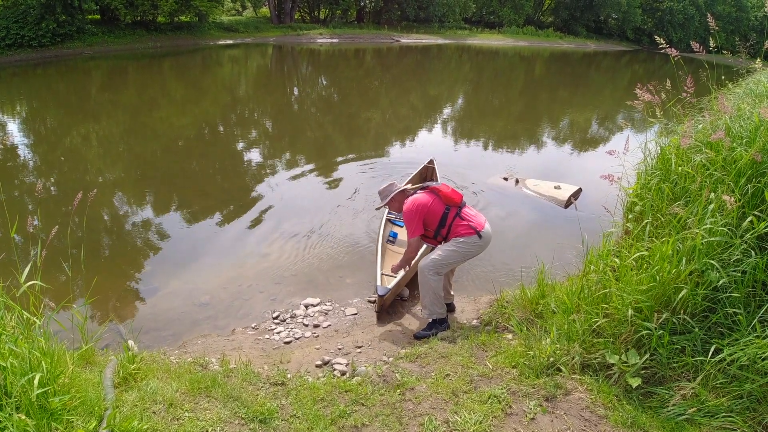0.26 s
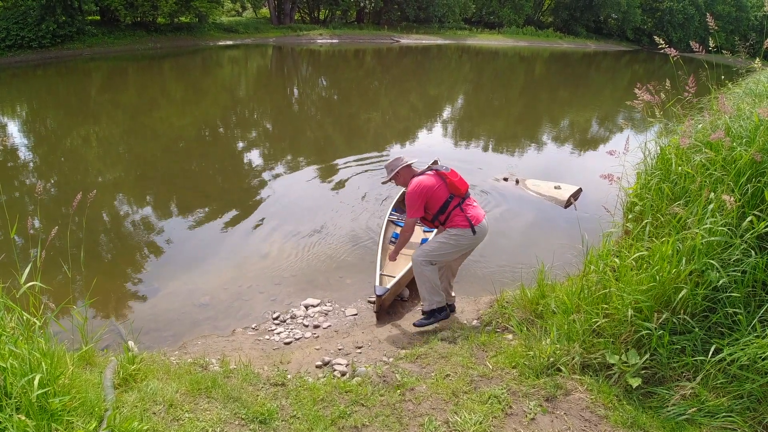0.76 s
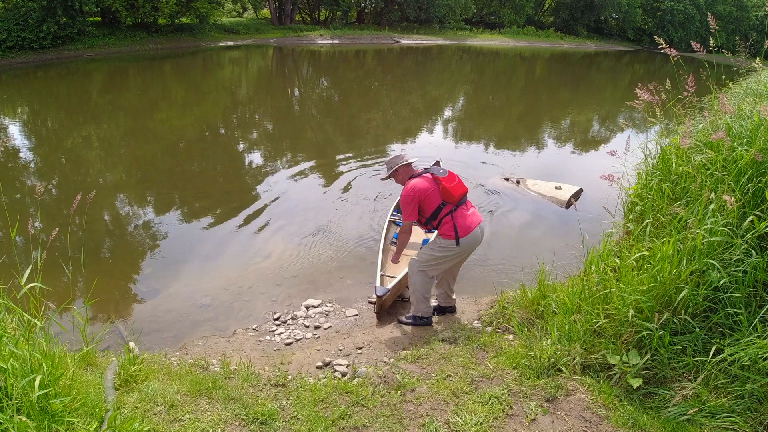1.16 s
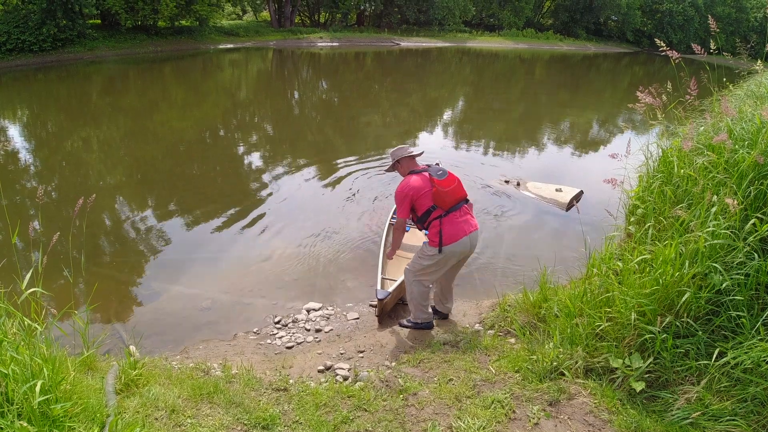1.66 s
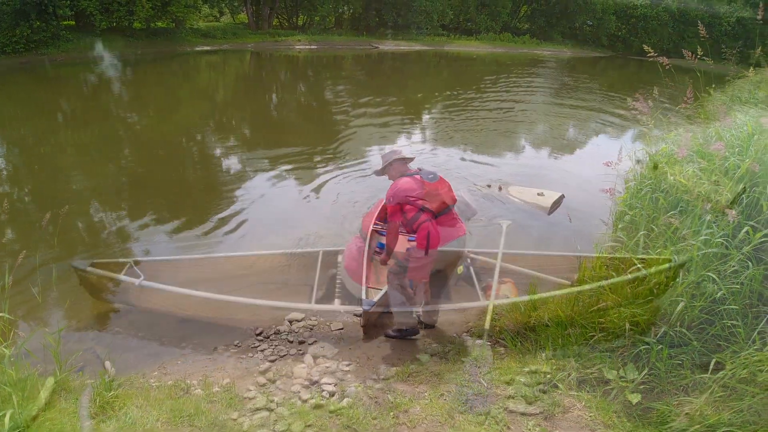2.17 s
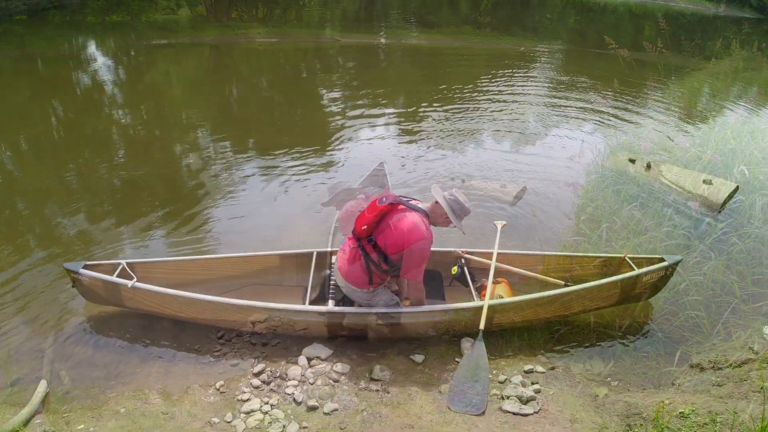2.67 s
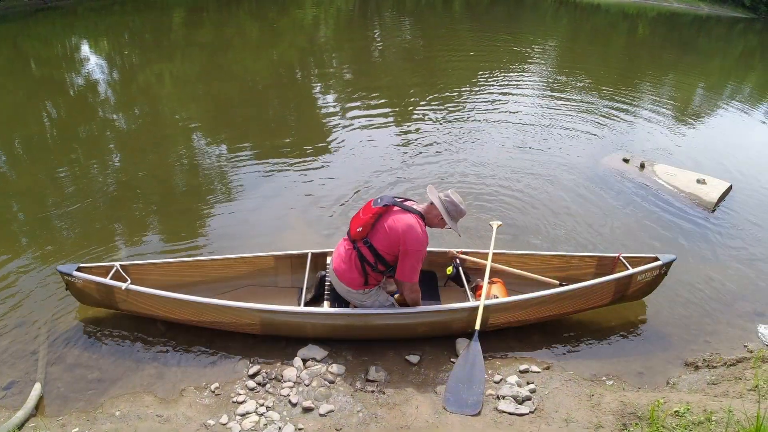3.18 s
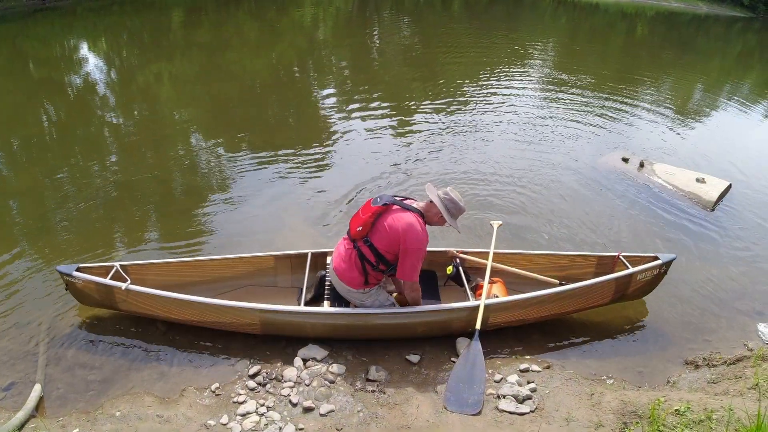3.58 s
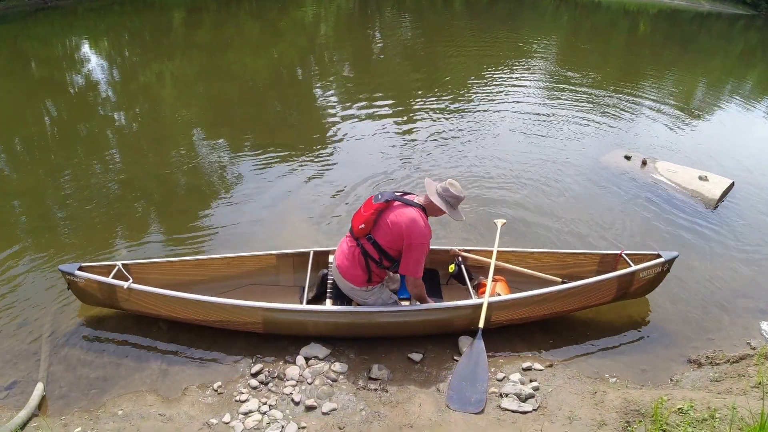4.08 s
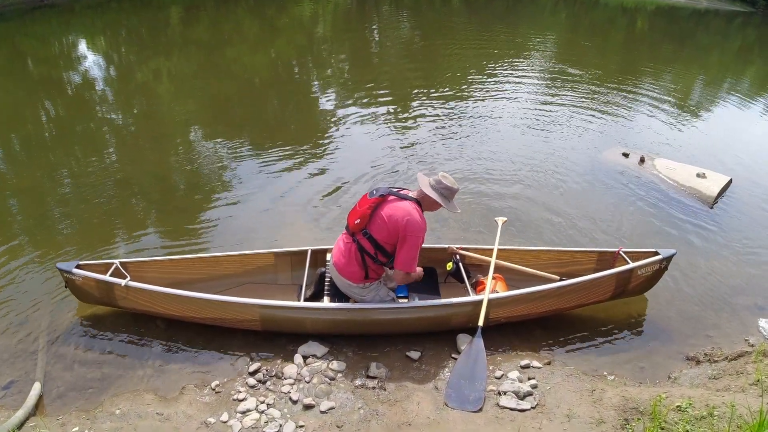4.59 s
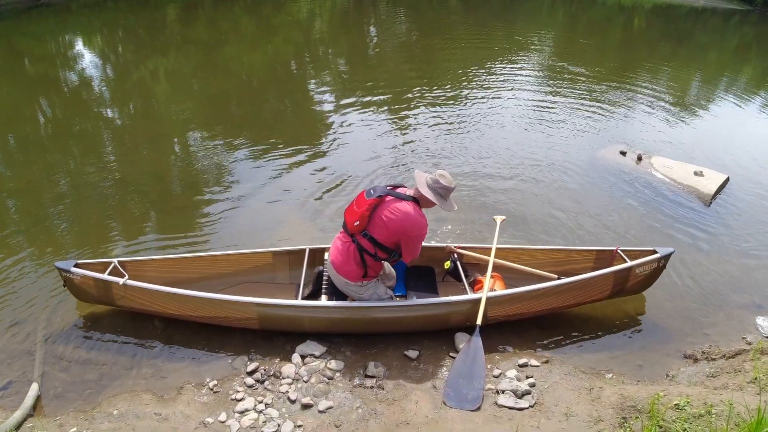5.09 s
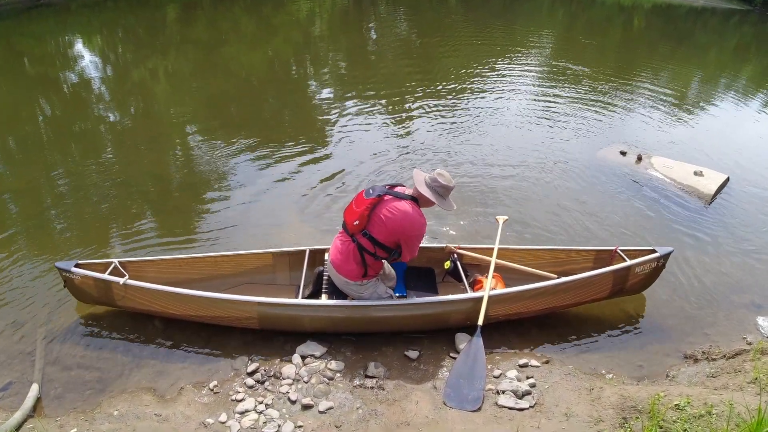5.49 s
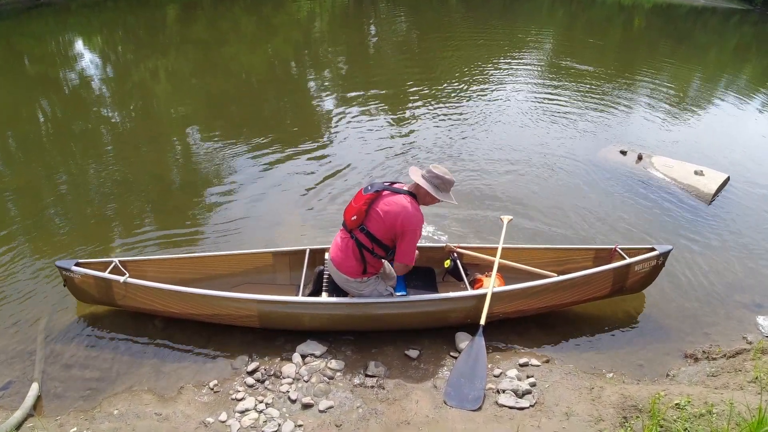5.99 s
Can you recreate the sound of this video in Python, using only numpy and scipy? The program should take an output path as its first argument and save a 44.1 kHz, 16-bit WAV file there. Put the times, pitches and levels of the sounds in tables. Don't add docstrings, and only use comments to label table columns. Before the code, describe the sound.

At a quiet riverbank, a few isolated knocks and scuffs sound on a hollow canoe while a distant warbler sings quick, echoing whistles. The sound crossfades to a nearer spot: steady pure whistles, a sparrow's buzzes, evenly spaced chips and a short trill, then clustered thumps, clacks and rattling gear. Soft wind, leaves and low distant traffic continue underneath, captured in stereo by a small microphone pair.

```python
import sys
import numpy as np
from scipy import signal
from scipy.fft import rfft, irfft, next_fast_len
from scipy.io import wavfile
from scipy.ndimage import uniform_filter1d, map_coordinates

SR = 44100
rng = np.random.default_rng(int(sys.argv[2]) if len(sys.argv) > 2 else 0)


def pcm_store(signal):
    levels = np.round(np.clip(np.atleast_2d(signal), -1, 1) * 32767)
    wavfile.write(sys.argv[1], SR, levels.astype(np.int16).T)


def gain_from_decibels(decibels):
    exponent = np.asarray(decibels, float) / 20
    return 10 ** exponent


N = 275625
MOVED_S = 2.6


def at_hz(points, hz):
    points = np.array(points)
    return np.interp(np.log(hz + 1), np.log(points[:, 0] + 1), points[:, 1])


def rms_one(x):
    return x / np.sqrt(np.mean(x ** 2) + 1e-20)


def add(track, s, sound):
    i = round(s * SR)
    track[i:i + len(sound)] += sound[:N - i]


def drift(rate):
    knots = rng.standard_normal(int(rate * N / SR) + 4)
    steps = np.arange(0, N + 32, 32)
    return np.interp(np.arange(N), steps, map_coordinates(knots, [steps * rate / SR], order=3))


def bandpass(x, band_hz, order):
    return signal.sosfilt(signal.butter(order, band_hz, "band", fs=SR, output="sos"), x)


def resonate(x, hz, width_hz):
    r = np.exp(-np.pi * width_hz / SR)
    zeros = np.array([1, 0, -1]) * (1 - r * r) / 2
    poles = [1, -2 * r * np.cos(2 * np.pi * hz / SR), r * r]
    return signal.lfilter(zeros, poles, x)


def sweep(length_s, from_hz, to_hz, edge, wobble_hz=0):
    n = round(length_s * SR)
    wobble = wobble_hz * np.interp(np.arange(n), np.linspace(0, n, 8), rng.standard_normal(8))
    turns = np.cumsum(np.linspace(from_hz, to_hz, n) + wobble) / SR + rng.random()
    return np.sin(2 * np.pi * turns) * signal.windows.tukey(n, np.clip(edge, 0, 1))


def whistle(rows):
    s, hz, level_db = np.transpose(rows)
    t = np.arange(s[0], s[-1], 1 / SR)
    wave = np.sin(2 * np.pi * np.cumsum(np.interp(t, s, hz)) / SR)
    return np.sqrt(2) * gain_from_decibels(np.interp(t, s, level_db)) * wave * signal.windows.tukey(len(t), .12)


# (frequency [Hz], left lead [rad])
FAR_PORTS = [(0, 0), (800, 0), (1400, .3), (2000, 1.5), (2900, 1.1), (3300, 2.1), (4600, 1.8), (5500, 0),
             (9000, 0)]
NEAR_PORTS = [(0, 0), (1100, .3), (2000, .7), (2350, -2.1), (3000, -2.2), (3700, -4), (4300, -4.2),
              (4600, -5.5), (5700, -5.9), (7000, -6.3), (9000, -6.5)]
WHISTLER_PORTS = [(0, 0), (3274, -2.3)]


def ports(x, lead):
    size = next_fast_len(N + 2048)
    turn = np.exp(.5j * at_hz(lead, np.arange(size // 2 + 1) * SR / size))
    return irfft(rfft(x, size) * np.array([turn, 1 / turn]), size)[:, :N]


def outdoors(x, lead, echo_s, echo_db, bush_db, bush_t60, trees_db, trees_t60, clear=0):
    t = np.arange(SR) / SR
    bush = gain_from_decibels(bush_db - 60 * t / bush_t60) / np.sqrt(bush_t60)
    trees = gain_from_decibels(trees_db - 60 * t / trees_t60) / np.sqrt(trees_t60)
    scatter = rng.standard_normal((2, SR)) * (bush + trees) * (t > .004) * np.sqrt(2 * np.log(1000) / SR)
    direct = x + gain_from_decibels(echo_db) * np.roll(x, round(echo_s * SR))
    return ports(direct + clear, lead) + signal.fftconvolve(x[None], scatter, axes=1)[:, :N]


# (frequency [Hz], density [dB per Hz])
FAR_AIR = [(12, -37), (25, -9), (50, -3), (125, -10), (250, -16.5), (500, -21.5), (900, -23.5),
           (1600, -31.5), (2600, -31), (4000, -39), (5600, -59), (8000, -49), (12500, -79.5), (17000, -52)]
NEAR_AIR = [(12, -5.5), (25, -3), (100, -6.5), (250, -17), (500, -25.5), (900, -23.5), (1500, -30.5),
            (2700, -33.5), (4100, -41), (5500, -55), (8000, -56.5), (10000, -55), (12500, -60.5),
            (17000, -52.5)]
# (frequency [Hz], width [Hz], level against the air [dB])
FAR_DRONE = [(53.17, 2.5, -5.5), (130.1, 19.2, -6.5)]
NEAR_DRONE = [(70.86, 4.5, -5.5), (94.5, 8, -3.5)]
# (frequency [Hz], likeness [-1..1])
LIKENESS = [(25, 0.8), (60, .99), (240, .99), (470, 0.95), (940, 0.83), (1880, 0), (3750, 0.2),
            (7500, 0.52), (14000, 0.4)]


def air(spectrum, drone, top_hz, patchy_db):
    out, together = 0, drift(2.5)
    edges_hz = 20 * 2 ** np.arange(0, 10.1, .5)
    white = rng.standard_normal((2, 2, N))
    for k, (low, high) in enumerate(zip(edges_hz, edges_hz[1:])):
        mid, side = bandpass(white[k % 2], [low, high], 2)
        hz = np.sqrt(low * high)
        alike = np.clip(at_hz(LIKENESS, hz), -1, 1)
        gain = gain_from_decibels(at_hz(spectrum, hz) + patchy_db * (0.2 * together + drift(9.2)))
        out = out + gain * (np.sqrt(1 + alike) * mid + np.sqrt(1 - alike) * side * [[1], [-1]])
    out = rms_one(out)
    for hz, width_hz, level_db in drone:
        hum = resonate(resonate(rng.standard_normal(N), hz, width_hz), hz, width_hz)
        out = out + gain_from_decibels(level_db) * rms_one(hum)
    return signal.sosfilt(signal.cheby2(12, 60, top_hz, fs=SR, output="sos"), out)


# (time [s], peak [dB], colour [Hz], fall [ms])
SCUFFS = [(2.008, -50, 1540, 10.7), (2.158, -47.5, 1820, 11.5), (2.808, -47, 2530, 18),
          (3.38, -33.5, 2160, 9.8), (3.654, -35.5, 2050, 12), (5.72, -45, 310, 31.6), (5.812, -49, 1900, 8)]
BANGS = [(4.624, -40, 1700, 7), (4.669, -40, 1490, 27), (4.696, -32, 1700, 12), (4.735, -42.5, 1500, 22),
         (5.604, -48, 2020, 7), (5.687, -40, 2600, 2.4), (4.707, -41, 1280, 8.9), (4.714, -41, 890, 16),
         (4.641, -46, 890, 9), (5.723, -51, 2400, 6), (5.794, -56, 2200, 3), (5.819, -47, 2000, 5)]
KNOCKS = [(0.3408, -41, 2900, 6.5), (1.098, -54, 1070, 4.5), (1.753, -57, 1300, 3), (1.802, -55, 1280, 3.1),
          (2.312, -58.5, 4900, 72), (4.199, -42, 60, 14), (4.641, -36, 191, 62), (4.70, -41, 354, 37),
          (4.881, -52, 1267, 19), (4.961, -34.5, 1050, 22), (4.963, -38.5, 600, 15),
          (5.039, -56, 3500, 5.5), (5.046, -40.5, 1020, 24), (5.604, -45, 2770, 7.7),
          (5.722, -51, 2900, 9.6), (4.975, -37, 405, 27), (4.944, -49, 1100, 22), (5.008, -50, 1300, 22),
          (4.962, -44, 1900, 9), (2.812, -71.5, 5770, 45), (4.651, -41.5, 306, 25)]
TICKS = [(0.88, -53, 4120, 21), (1.011, -63, 4170, 7.7), (1.659, -51, 4400, 15), (3.08, -61, 4280, 39),
         (3.268, -49.5, 4030, 13.4), (4.645, -49.5, 2020, 5.8), (4.772, -46.5, 600, 20),
         (4.893, -45, 4650, 14), (4.957, -48, 3700, 10), (5.128, -48, 3780, 3), (5.303, -53.5, 1200, 11.6),
         (5.516, -56, 1910, 7.1), (5.635, -58, 1610, 9.3), (5.656, -46, 3370, 16), (5.672, -47, 2050, 18),
         (5.721, -53, 1940, 10), (5.756, -48, 920, 5.5), (5.77, -37.5, 3290, 12.5), (5.84, -45.5, 2130, 6),
         (5.888, -44, 3230, 6.6), (5.93, -50, 3580, 12), (2.318, -71, 8200, 120), (2.325, -83, 8950, 40),
         (4.736, -55, 1870, 5.8), (4.74, -52, 2750, 12), (4.792, -54, 3540, 6), (5.812, -46, 3048, 6.8),
         (5.816, -51, 2130, 10), (5.818, -54, 1410, 8), (5.837, -50, 3020, 13), (5.883, -62, 2100, 6),
         (5.9, -47, 3120, 5), (5.911, -49, 3150, 4), (5.742, -57, 2020, 5.5), (5.683, -47, 3250, 7)]
SLIDES = [(2.47, -62, 4200, 21), (2.735, -42.5, 2900, 17), (2.79, -50, 2420, 39), (2.835, -47, 1620, 18),
          (2.83, -49, 866, 40), (2.865, -53.5, 4100, 20), (5.23, -44, 2860, 33), (2.835, -44.5, 3540, 20),
          (2.755, -53, 3200, 40), (5.228, -45, 3250, 18), (5.235, -46, 2450, 35), (2.775, -55, 850, 40),
          (2.825, -50, 2400, 25), (5.28, -55, 900, 40)]
# (colour width [octaves], rise [share of fall], hold [share of fall], hull ring [dB])
CONTACT_KINDS = [
    (2.2, 1.1, 2.6, 2),
    (2.43, 0.23, 0.13, 1),
    (0.86, 0.17, .1, -5),
    (0.26, 0.17, 0.15, -12),
    (0.29, 0.55, 0.11, -1),
]


def contacts(near):
    rows = []
    for table, (octaves, rise, hold, ring_db) in zip((SCUFFS, BANGS, KNOCKS, TICKS, SLIDES), CONTACT_KINDS):
        for s, peak_db, hz, fall_ms in table:
            if (s > MOVED_S) == near:
                rows.append((s, peak_db, hz, octaves, rise * fall_ms, abs(hold) * fall_ms, fall_ms, ring_db))
    return rows


# (frequency [Hz], level [dB], t60 [s])
HULL = [(225, -3, .05), (275, -3, .05), (480, -6, .04), (725, -6, .04), (920, -3, .03), (1250, -5, .025),
        (1390, -5, .03), (1650, -3, .035), (1950, -4, .035), (2090, -5, .035), (2480, -5, .03),
        (2770, -6, .03), (3400, -7, .03)]


def knocks(table, ring_db, grit_db):
    out, t_ms = np.zeros(N), np.arange(round(.3 * SR)) * 1000 / SR
    for s, peak_db, hz, octaves, rise_ms, hold_ms, fall_ms, kind_db in table:
        t = t_ms[t_ms < rise_ms + hold_ms + 7 * fall_ms + 60]
        force = np.minimum(t / rise_ms, 1) ** 2 * np.exp(-np.maximum(t - rise_ms - hold_ms, 0) / fall_ms)
        rough_db = grit_db * rng.standard_normal(len(t) // 40 + 1).repeat(40)[:len(t)]
        grit = rng.standard_normal(len(t)) * gain_from_decibels(rough_db)
        band = np.clip(hz * 2.0 ** (np.array([-.5, .5]) * max(octaves, .05)), 15, .45 * SR)
        rub = bandpass(force * grit, band, 3)
        dull_hz = min(1.25 * band[1], max(4150, 1.6 * hz))
        rub = signal.sosfilt(signal.butter(12, dull_hz, fs=SR, output="sos"), rub)
        rings = 0
        for mode_hz, mode_db, t60 in HULL:
            strength = gain_from_decibels(mode_db + rng.normal(0, 3.8))
            rings = rings + strength * resonate(rub, mode_hz, np.log(1000) / np.pi / min(t60, .06))
        sound = rub + gain_from_decibels(ring_db + kind_db) * rings
        add(out, s, gain_from_decibels(peak_db) * sound / np.abs(sound).max())
    return out


# (time [s], length [s], pitch [Hz], peak [dB])
HELD_NOTES = [(1.004, 0.049, 3460, -67.5), (1.019, 0.048, 3048, -57.5), (1.159, 0.019, 2550, -63.5),
              (1.166, 0.032, 2920, -57.5), (1.293, 0.012, 3936, -52.5), (1.439, 0.052, 3520, -57.5),
              (1.475, 0.033, 3350, -56), (1.495, 0.047, 3466, -60.5), (1.525, 0.045, 2895, -61.5),
              (1.583, 0.069, 2504, -60), (1.624, 0.045, 2770, -58.5), (1.665, 0.033, 2890, -60.5),
              (1.74, 0.06, 2800, -50), (1.781, .04, 3130, -49.5), (1.809, 0.058, 2950, -58),
              (1.965, 0.03, 2750, -48.5), (2.098, .047, 3123, -55.5), (2.166, .05, 3070, -64),
              (2.183, 0.023, 3530, -62), (2.23, 0.017, 3830, -64), (2.263, 0.029, 2770, -59),
              (2.353, 0.058, 2890, -54.5), (2.413, 0.025, 2874, -49.5), (2.477, 0.058, 2477, -57.5),
              (1.704, .04, 2320, -67.5), (1.927, 0.055, 2390, -64.5), (6.127, .04, 4140, -74),
              (1.562, 0.04, 5020, -81), (1.657, 0.027, 2120, -68.5), (1.684, 0.01, 2850, -57)]
# (time [s], length [s], from [Hz], to [Hz], peak [dB])
SLURS = [(.898, 0.1, 2410, 3140, -72), (1.263, 0.048, 4560, 3850, -62), (1.316, 0.045, 3300, 2750, -58),
         (1.38, .059, 3570, 3340, -66.5), (1.408, 0.042, 3050, 3506, -59), (1.571, 0.034, 3100, 2980, -53),
         (1.881, 0.065, 2870, 2340, -61), (2.056, 0.05, 4880, 4100, -66.5), (2.089, .028, 3850, 3080, -56),
         (1.172, 0.034, 2480, 2130, -67.5), (1.177, 0.033, 2720, 3630, -62.5),
         (1.306, 0.074, 3850, 3490, -64), (2.134, .045, 3200, 3550, -56), (2.236, 0.034, 3155, 2920, -60.5),
         (2.288, 0.068, 2620, 2230, -62), (2.349, 0.043, 2412, 2540, -60), (2.529, 0.057, 2486, 2770, -50)]
HELD_RISE = 0.03


def warbler():
    out = np.zeros(N)
    held = [(s, length_s, hz * (1 - HELD_RISE / 2), hz * (1 + HELD_RISE / 2), db)
            for s, length_s, hz, db in HELD_NOTES]
    for s, length_s, from_hz, to_hz, peak_db in held + SLURS:
        add(out, s, gain_from_decibels(peak_db) * sweep(length_s, from_hz, to_hz, edge=0.69, wobble_hz=45))
    return out * gain_from_decibels(1.4 * drift(60) + 3.8 * drift(260))


# (time [s], peak [dB], frequency [Hz], t60 [ms])
BLOWS = [(1.099, -44.5, 994, 30), (1.101, -45, 176, 32), (1.7267, -37, 227, 67), (1.7275, -40, 472, 37),
         (1.74, -42, 54.5, 330), (4.626, -44.5, 138, 140), (4.627, -40.5, 280, 82),
         (4.6835, -33.5, 3930, 24), (4.963, -31, 883, 30), (4.98, -41, 278, 200), (4.99, -35, 95, 500),
         (5.066, -41, 270, 84), (4.627, -44, 1530, 33), (4.628, -42.5, 944, 46), (4.706, -32, 2210, 23),
         (4.699, -38.5, 890, 35), (5.687, -49, 2100, 25), (4.982, -48, 274, 82), (5.302, -48, 1250, 45),
         (5.515, -51, 1950, 25), (5.723, -49, 1950, 35), (5.742, -50, 1950, 22), (5.841, -47, 2120, 30),
         (5.772, -48, 3300, 22), (5.659, -51, 3250, 30), (5.839, -51, 3000, 20), (5.758, -48, 900, 25),
         (4.716, -42, 900, 50), (4.963, -43, 1650, 30), (4.698, -42, 1450, 20), (5.606, -50, 2900, 12),
         (5.238, -50, 3200, 45), (4.652, -43, 330, 70)]
# (time [s], peak [dB], frequency [Hz], t60 [ms])
PUSHES = [(4.964, -36, 215.5, 130), (4.964, -35.5, 972, 68), (4.965, -40.5, 726, 77), (4.967, -43, 400, 67),
          (4.64, -40, 202, 85), (5.666, -39.5, 790, 18), (5.671, -33, 854, 41), (5.692, -40, 790, 40),
          (5.912, -42, 785, 74), (4.972, -42, 262, 90), (4.645, -42, 110, 200), (4.755, -42, 95, 200)]
SWELL_SHARE, PUSH_SWELL_SHARE = 0.038, 0.17


def blows(near):
    out, t_ms = np.zeros(N), np.arange(round(.5 * SR)) * 1000 / SR
    for table, share in ((BLOWS, SWELL_SHARE), (PUSHES, PUSH_SWELL_SHARE)):
        for s, peak_db, hz, t60_ms in table:
            if (s > MOVED_S) != near:
                continue
            rise_ms = share * t60_ms
            rise = np.sin(np.pi / 2 * t_ms / rise_ms) ** 2
            swell = np.where(t_ms < rise_ms, rise, gain_from_decibels(-60 * (t_ms - rise_ms) / t60_ms))
            add(out, s, -gain_from_decibels(peak_db) * swell * np.sin(2 * np.pi * hz * t_ms / 1000))
    return out


# (middle [s], spread [s], level [dB])
RUMMAGE = [(3.17, 0.79, -86), (4.62, 0.11, -72.5), (5.1, 0.31, -68), (5.79, 0.18, -57), (4.71, .06, -57)]


def rummage(per_s, size_db):
    t = np.arange(N) / SR
    busy = sum(gain_from_decibels(level_db) * np.exp(-((t - s) / spread_s) ** 2) for s, spread_s, level_db in RUMMAGE)
    struck = rng.random(N) < per_s * gain_from_decibels(5.0 * drift(18)) / SR
    ticks = struck * gain_from_decibels(size_db * np.minimum(rng.exponential(1, N), 4))
    dealt = rng.integers(0, len(HULL), N)
    rings = sum(gain_from_decibels(mode_db) * resonate(ticks * (dealt == k) + 1e-18, hz, 0.1 * hz)
                for k, (hz, mode_db, _) in enumerate(HULL))
    dulled = signal.sosfilt(signal.butter(4, 4200, fs=SR, output="sos"), rings)
    return busy * rms_one(dulled)


# (time [s], hold [s], level [dB])
WHISTLES = [(2.887, 0.066, -39.5), (3.119, 0.16, -66), (3.275, 0.085, -36.5), (3.522, .07, -56)]
WHISTLE_HZ = 3274
WHISTLE_ATTACK_S, WHISTLE_START_DB = 0.02, -9
WHISTLE_DROP_S, WHISTLE_DROP_DB = .014, -9
WHISTLE_RELEASE_S, WHISTLE_END_DB = 0.05, -18


def whistler():
    out = np.zeros(N)
    for s, hold_s, level_db in WHISTLES:
        times = s + np.array([0, WHISTLE_ATTACK_S, hold_s, hold_s + WHISTLE_DROP_S, hold_s + WHISTLE_RELEASE_S])
        levels = level_db + np.array([WHISTLE_START_DB, 0, 0, WHISTLE_DROP_DB, WHISTLE_END_DB])
        add(out, s, whistle(np.transpose([times, np.full(len(times), WHISTLE_HZ), levels])))
    return out


# (start [s], sweeps [count], first gap [ms], growth per gap [ms])
BUZZ_TIMING = [(3.463, 10, 5.75, 0), (3.4805, 13, 5.75, 0), (3.4985, 10, 5.75, 0), (3.6142, 13, 17.4, .086),
               (3.6192, 13, 17.4, .086), (3.607, 14, 17.4, .086), (3.627, 13, 17.4, .086),
               (4.6585, 10, 20.3, .3), (4.6555, 10, 20.3, .3)]
# (length [s], from [Hz], to [Hz], peak [dB])
BUZZ_SWEEPS = [(0.0245, 8270, 7100, -54.5), (0.005, 7050, 6380, -38.5), (0.0031, 6160, 5450, -49),
               (0.0062, 2900, 4150, -34), (0.0045, 2900, 4100, -36), (0.011, 3900, 3600, -45),
               (0.007, 4800, 5100, -61.5), (0.006, 5350, 4300, -42), (0.0025, 2500, 5600, -45)]


def buzzes():
    out = np.zeros(N)
    for (start, count, gap_ms, longer_ms), (length_s, from_hz, to_hz, peak_db) in zip(BUZZ_TIMING, BUZZ_SWEEPS):
        k = np.arange(count)
        times = start + (k * gap_ms + k ** 2 * longer_ms / 2) / 1000
        swells = np.sin(np.pi * ((k + 0.21) / (count + 0.5)) ** 0.68) ** 0.71
        for s, swell in zip(times, swells):
            level = swell * gain_from_decibels(peak_db + rng.normal(0, 2.2))
            add(out, s, level * sweep(length_s, from_hz, to_hz, edge=.9))
    return out


# (time [s], peak [dB])
CHIPS = [(3.5575, -33), (3.923, -36), (4.0448, -37.5), (4.1648, -36.5), (4.287, -36.5), (4.4106, -37),
         (4.5354, -37)]
CHIP_S, CHIP_FROM_HZ, CHIP_TO_HZ = 0.0165, 5650, 3850
SNAP_DELAY_S, SNAP_S, SNAP_DB, SNAP_FROM_HZ, SNAP_TO_HZ = 0.012, 0.003, -5, 4960, 4300
CHIP_HISS_S, CHIP_HISS_HZ, CHIP_HISS_WIDTH_HZ, CHIP_HISS_DB = 0.077, 6260, 3200, -40


def chips():
    out = np.zeros(N)
    for s, peak_db in CHIPS:
        add(out, s - .005, gain_from_decibels(peak_db - 0.5) * sweep(CHIP_S, CHIP_FROM_HZ, CHIP_TO_HZ, edge=0.8))
        add(out, s + SNAP_DELAY_S, gain_from_decibels(peak_db + SNAP_DB) * sweep(SNAP_S, SNAP_FROM_HZ, SNAP_TO_HZ, edge=0.31))
        hiss = rng.standard_normal(round(CHIP_HISS_S * SR))
        for _ in range(2):
            hiss = resonate(hiss, CHIP_HISS_HZ, CHIP_HISS_WIDTH_HZ)
        add(out, s - CHIP_HISS_S / 2, gain_from_decibels(peak_db + CHIP_HISS_DB) * rms_one(hiss) * np.hanning(len(hiss)))
    return out


# (delay [s], length [s], from [Hz], to [Hz], level against the chip [dB])
CHIP_PARTNERS = [(-0.017, 0.042, 7590, 7560, -22.5), (.026, 0.04, 2370, 2370, -12),
                 (0.036, 0.036, 2590, 2610, -20), (-.012, 0.014, 5300, 5400, -15),
                 (-0.025, 0.03, 7050, 7200, -33), (-.032, .022, 7560, 7600, -33),
                 (.066, .05, 2780, 2740, -25), (.034, .04, 2820, 2860, -23)]


def chip_partners():
    out = np.zeros(N)
    for s, peak_db in CHIPS[1:]:
        for delay_s, length_s, from_hz, to_hz, level_db in CHIP_PARTNERS:
            level = gain_from_decibels(peak_db + level_db + rng.normal(0, 1.5))
            add(out, s + delay_s, level * sweep(length_s, from_hz, to_hz, edge=0.75, wobble_hz=25))
    return out


TRILL_S, TRILL_HOLD_S, TRILL_DB, TRILL_SAG_DB = 4.644, 0.214, -43, -8
TRILL_HZ, TRILL_SAG_HZ, TRILL_ATTACK_S, TRILL_RELEASE_S = 5455, -140, 0.011, 0.01
TRILL_PEAK_S, TRILL_ENTRY_DB = .032, -8
STROKE_FALL_HZ, STROKE_SWELL_DB, BREAK_DELAY_S, BREAK_S = 140, 6, .0055, .002


def trill_tone():
    t, end = np.arange(N) / SR, TRILL_S + TRILL_HOLD_S
    start, count, gap_ms, longer_ms = BUZZ_TIMING[-1]
    k = np.arange(-1, count + 1)
    breaks = start + BREAK_DELAY_S + (k * gap_ms + k ** 2 * longer_ms / 2) / 1000
    position = np.interp(t, breaks, k)
    stroke = position % 1 - .5
    hz = np.interp(t, [TRILL_S, end], [TRILL_HZ, TRILL_HZ + TRILL_SAG_HZ]) - STROKE_FALL_HZ * stroke
    times = [TRILL_S, TRILL_S + TRILL_ATTACK_S, TRILL_S + TRILL_PEAK_S, end, end + TRILL_RELEASE_S]
    levels = [-30, TRILL_ENTRY_DB, 0, TRILL_SAG_DB, -40]
    level_db = TRILL_DB + np.interp(t, times, levels, left=-200, right=-200)
    nearest = np.interp(np.round(position), k, breaks)
    gaps = np.exp(-((t - nearest) / BREAK_S) ** 2) * (t > breaks[1] + .01)
    wave = np.sqrt(2) * np.sin(2 * np.pi * np.cumsum(hz) / SR) * (1 - .8 * gaps)
    swell_db = uniform_filter1d(STROKE_SWELL_DB * stroke, size=64)
    return wave * gain_from_decibels(level_db + swell_db + 2.2 * drift(300))


FAR_DB, FAR_FADES_S, FAR_GONE_S = -58, 2.37, 4.1
NEAR_DB, NEAR_ENTERS_S, NEAR_FULL_S, NEAR_GROWS_DB_PER_S = -50.5, 1.66, 3.27, 0.6
AIR_TOP_HZ = 16400
SOFT_CLEAR_SHARE = .45


def scene():
    t = np.arange(N) / SR
    leaving = np.interp(t, [FAR_FADES_S, FAR_GONE_S], [1, 0])
    far = gain_from_decibels(FAR_DB) * leaving * air(FAR_AIR, FAR_DRONE, AIR_TOP_HZ, patchy_db=2.7)
    entering = np.interp(t, [NEAR_ENTERS_S, NEAR_FULL_S], [0, 1])
    near_level = gain_from_decibels(NEAR_DB + NEAR_GROWS_DB_PER_S * (t - NEAR_FULL_S)) * entering
    near = near_level * air(NEAR_AIR, NEAR_DRONE, AIR_TOP_HZ, patchy_db=1.0)

    far_hull = knocks(contacts(near=False), ring_db=3.0, grit_db=3.5) + blows(near=False)
    near_hull = knocks(contacts(near=True), ring_db=3.5, grit_db=2.0) + blows(near=True)
    near_hull = near_hull + rummage(per_s=890, size_db=5.0)
    hull = ports(far_hull, FAR_PORTS) + ports(near_hull, NEAR_PORTS)

    birds = outdoors(gain_from_decibels(-1.0) * warbler(), FAR_PORTS, echo_s=0.019, echo_db=-10.0,
                     bush_db=-6.5, bush_t60=0.16, trees_db=-6.0, trees_t60=0.98)
    birds += outdoors(whistler(), WHISTLER_PORTS, echo_s=.02, echo_db=-15,
                      bush_db=-18, bush_t60=.2, trees_db=-29, trees_t60=.6)
    soft = buzzes() + chip_partners() + trill_tone()
    birds += outdoors(chips() + (1 - SOFT_CLEAR_SHARE) * soft, NEAR_PORTS, echo_s=.0125, echo_db=-15,
                      bush_db=-8, bush_t60=.17, trees_db=-21, trees_t60=.9, clear=SOFT_CLEAR_SHARE * soft)
    return far + near + birds + hull


def band_limit(x):
    return signal.sosfilt(signal.butter(12, 15750, fs=SR, output="sos"), x)


MASKED_HZ = [6000, 7300, 10000]
# (low [Hz], high [Hz])
TRILL_BAND_HZ = [5250, 5650]
WIDE_BAND_FROM_S, NARROW_HZ, LOUD_BIRD_TOP_HZ, RAGGED_HZ = 2.93, 12800, 8400, 14300
TOP_LOST_SHARE = .95


def record(dry):
    def treble(hz):
        return signal.sosfiltfilt(signal.butter(12, hz, "high", fs=SR, output="sos"), dry)

    def gate(x, window, db):
        return uniform_filter1d((uniform_filter1d(x ** 2, size=window) > gain_from_decibels(2 * db)) * 1., size=512)

    top, very_top, topmost = treble(LOUD_BIRD_TOP_HZ), treble(NARROW_HZ), treble(RAGGED_HZ)
    masked, above = (signal.sosfiltfilt(signal.butter(8, band, "band", fs=SR, output="sos"), dry)
                     for band in zip(MASKED_HZ, MASKED_HZ[1:]))
    mono = dry.mean(axis=0)
    bird_loud = gate(bandpass(mono, [3900, 8000], 2), 1536, -54)
    tone = np.roll(bandpass(mono, TRILL_BAND_HZ, 2), 600)
    held, strong = gate(tone, 2048, -53.5), gate(tone, 2048, -46)
    lost = TOP_LOST_SHARE * bird_loud * (1 - held) * top
    lost = lost + held * masked + (.35 * held + .65 * strong) * above
    for band, spared in ((very_top - topmost, 1.1), (topmost, .2)):
        patches = uniform_filter1d((drift(22) > spared) * 1., size=512)
        lost = lost + (1 - bird_loud) * patches * band
    narrow = np.arange(N) < WIDE_BAND_FROM_S * SR
    return band_limit(dry - np.where(narrow, very_top, lost))


dry = scene()
out = record(dry)
pcm_store(out)
```